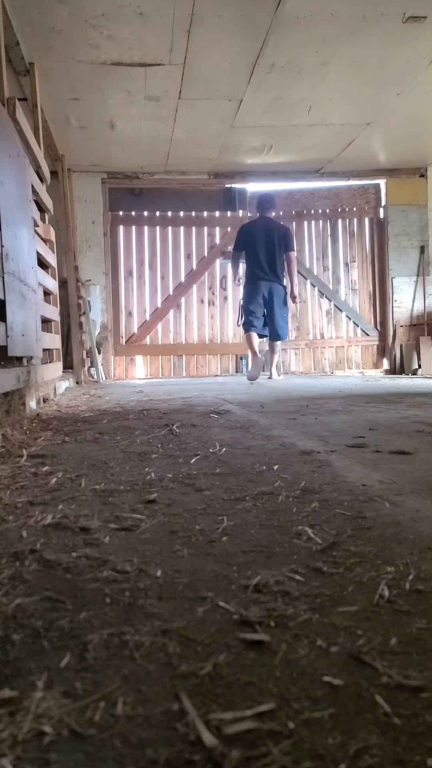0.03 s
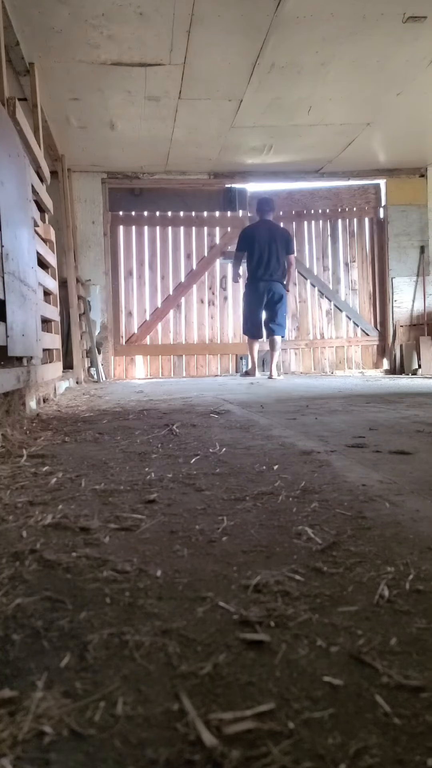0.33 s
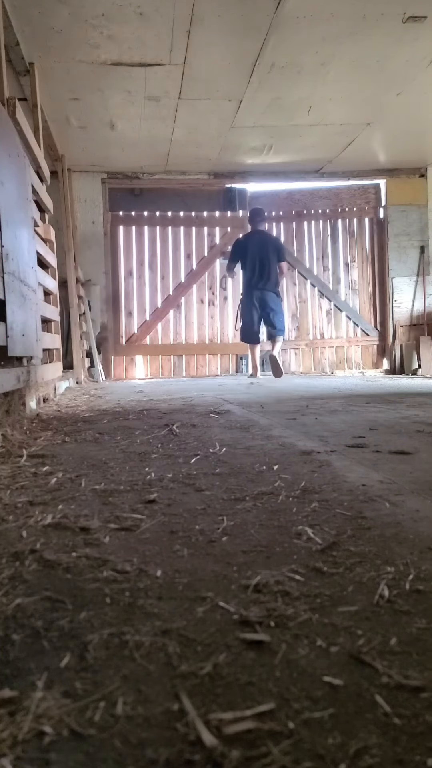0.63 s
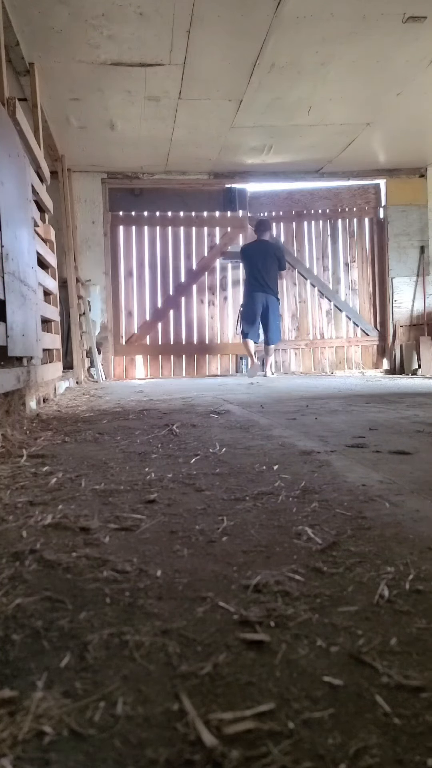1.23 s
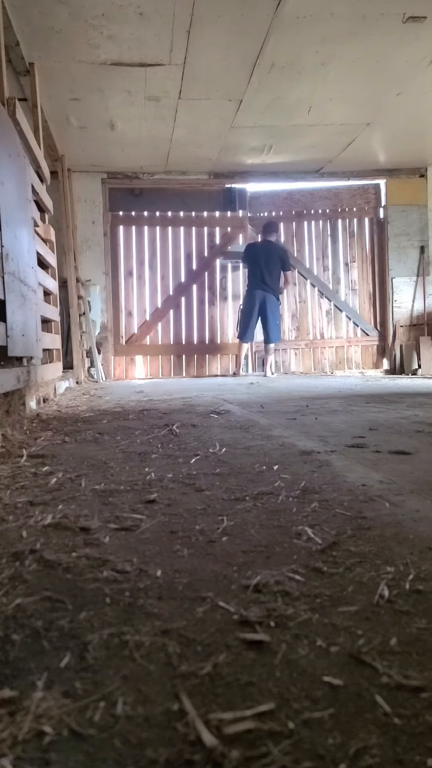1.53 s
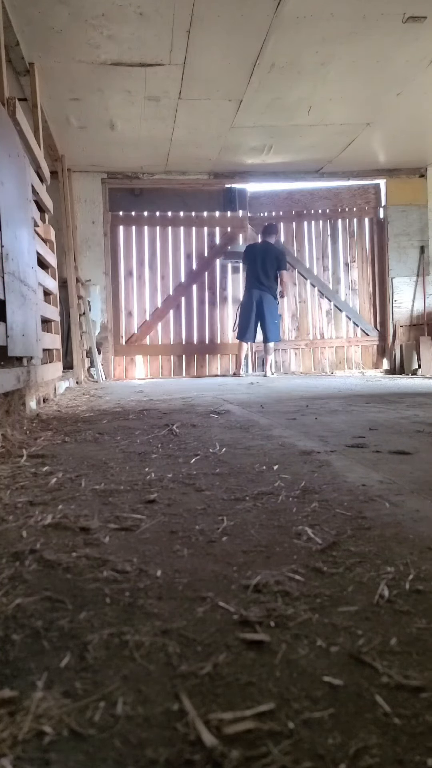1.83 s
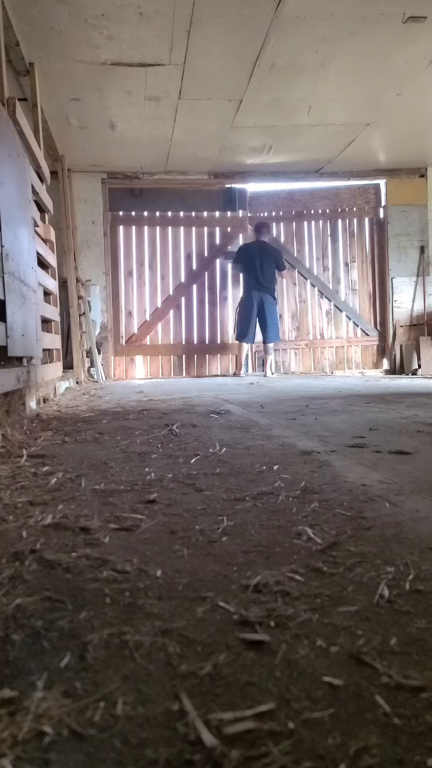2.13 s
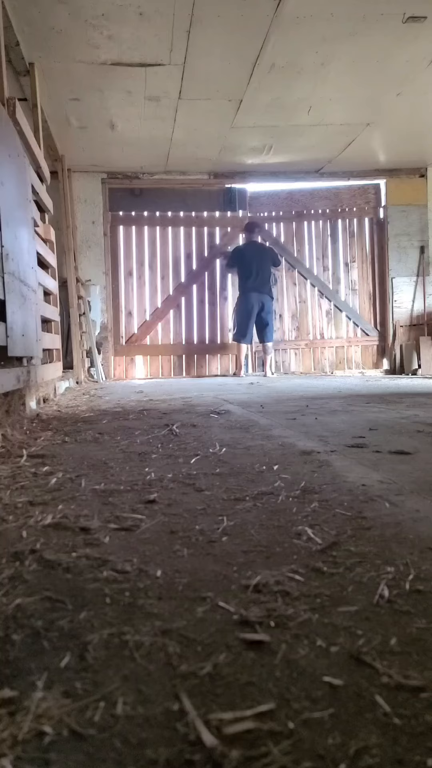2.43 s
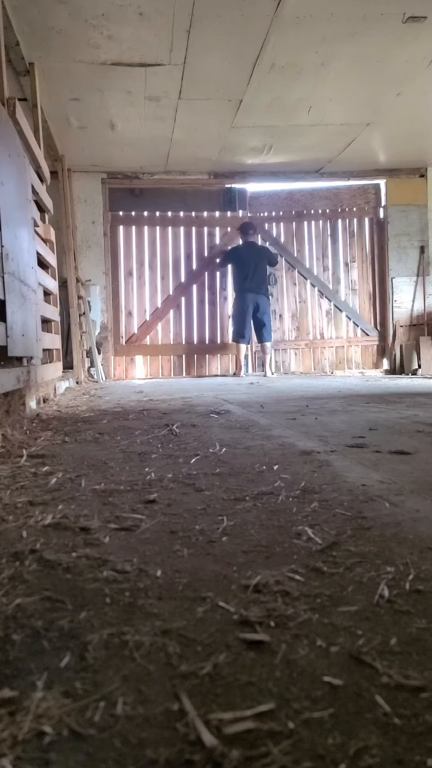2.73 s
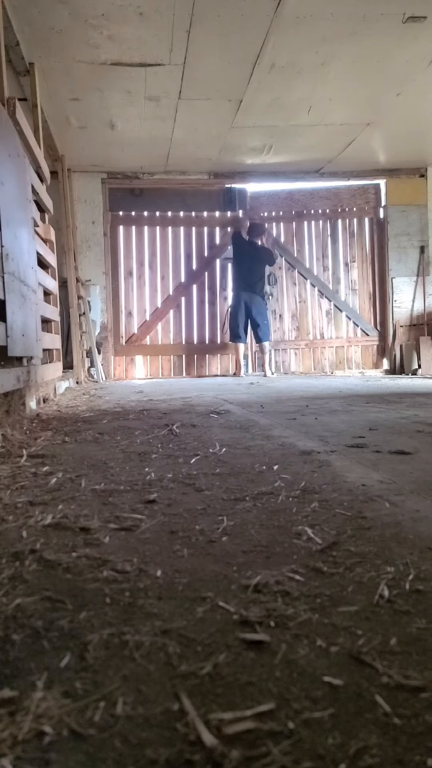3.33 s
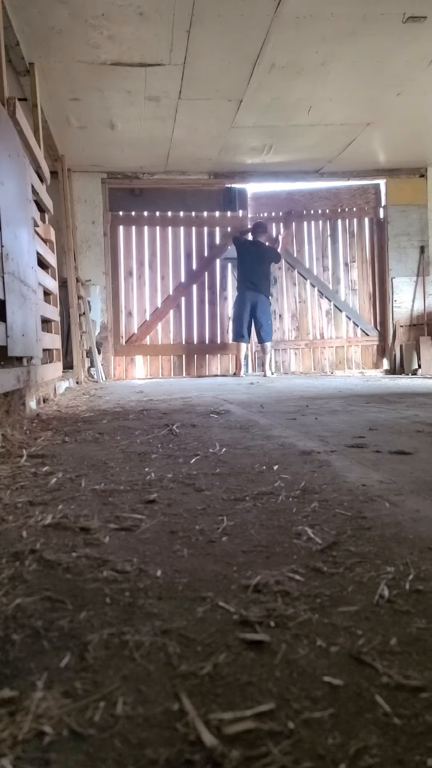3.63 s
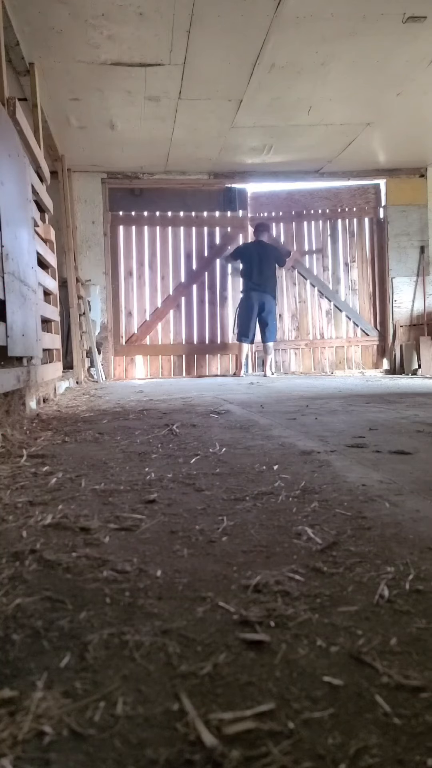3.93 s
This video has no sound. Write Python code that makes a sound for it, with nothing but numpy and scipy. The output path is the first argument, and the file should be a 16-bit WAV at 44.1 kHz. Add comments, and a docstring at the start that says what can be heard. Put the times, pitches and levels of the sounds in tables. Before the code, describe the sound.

Wooden barn door clattering and rumbling as it is pulled, following a few quiet steps.

```python
"""An empty barn with a straw-strewn floor. Someone takes a few soft steps, knocks twice against the
big slatted door and pulls it along. Small slips scrape and its weight rumbles; loose boards clatter,
ironwork snaps, wood creaks and jolts set the whole panel booming. The barn answers every sound;
a two-port microphone listens from far back, over a faint hiss."""
import sys
import numpy as np
from scipy import signal
from scipy.fft import rfft, irfft
from scipy.io import wavfile
from scipy.ndimage import uniform_filter1d

SR = 44100
rng = np.random.default_rng(int(sys.argv[2]) if len(sys.argv) > 2 else 0)


def digitize_waveform(pressure):
    """Quantize a signal to 16-bit integers and store it at the path in sys.argv[1].

    Rows of a 2-D input are taken as channels; values are limited to [-1, 1].
    """
    field = np.atleast_2d(pressure).T
    bounded = np.clip(field, -1, 1)
    quanta = np.round(bounded * 32767).astype(np.int16)
    wavfile.write(sys.argv[1], SR, quanta)


N = 176400


def knocks():
    """Knocks and loose-board clatter: each blow a short wood-on-wood chatter with its own tone."""
    # tone bands (frequency [Hz])
    bands_hz = [200, 900, 1900, 3800]
    # blows (time [s], gain in each of the four bands [dB])
    blows = [(1.773, -2.5, 4.5, 4.5, 0.5), (2.277, -4, 4.5, 7, -15), (2.294, 1, -1.5, 8.5, -9.5),
             (2.760, -38, -8, -10.5, -6.5), (2.870, -5, 0, 7, 0.5), (2.892, 3.5, 8.5, -19, -15),
             (2.972, -1.5, -6, -1, -5), (3.057, -0.5, 2, 5, 1.5), (3.084, -24, 4, -1, -10),
             (3.157, -2, -3, -1, 0), (3.472, 8, 2.5, 6, 1.5), (3.492, -4, -2, -16, -9),
             (3.620, 5, 2.5, 4, -2), (3.728, 1.5, 0, -1, -5), (3.831, -2, 0.5, 2.5, -3),
             (3.941, -1.5, -2.5, 0, -4.5)]
    # board spectrum (frequency [Hz], gain [dB])
    wood_eq = [(65, -12), (170, 1), (1200, 4.5), (1700, -2.5), (4200, 2.5), (5600, -5.5), (7000, -6.5),
               (8500, -32.5)]
    out = np.zeros(N)
    for s, *gains_db in blows:
        add(out, s, colour(burst(decay_s=0.0075), list(zip(bands_hz, gains_db))))
    return colour(out, wood_eq)


def slats():
    """A squarely struck slat rings briefly at its own pitch."""
    # strikes (time [s], pitch [Hz], level [dB])
    strikes = [(1.764, 757, -36), (2.277, 651, -39), (2.297, 1244, -38.5), (2.892, 643.5, -33.5)]
    # slat modes (pitch ratio [1], level [dB], t60 [s])
    modes = [(.49, -6.5, .13), (1, 1, .11), (1.56, 1.5, 0.12)]
    out, t = np.zeros(N), np.arange(SR) / SR
    for s, hz, db in strikes:
        add(out, s, amp(db) * modal_ring(modes, hz, t))
    return out


def drag():
    """Countless small slips scrape; the door's weight rumbles."""
    # pull envelope (time [s], scrape [dB], rumble [dB])
    pull = [(2.74, -64, -108), (2.797, -53, -84), (3.03, -48.5, -59.5), (3.08, -42, -50.5),
            (3.33, -41.5, -52.5), (3.43, -45.5, -42), (3.56, -41.5, -44.5), (3.68, -48.5, -49),
            (3.80, -54, -64), (3.87, -53, -56.5), (4.0, -49, -63)]
    # scrape and rumble spectra (frequency [Hz], gain [dB])
    scrape_eq = [(60, -16.5), (200, -3), (1200, 0.5), (2100, -4.5), (3200, -3), (6300, -6), (8600, -23.5),
                 (15000, -26.5)]
    rumble_eq = [(30, -1), (70, -5), (170, -1), (280, -5.5), (1500, -53.5)]
    s, scrape_db, rumble_db = np.transpose(pull)
    t = np.arange(N) / SR
    scrape = unit(colour(grains(per_s=500, spread_db=5), scrape_eq))
    rumble = unit(colour(rng.standard_normal(N), rumble_eq))
    scrape *= amp(np.interp(t, s, scrape_db))
    rumble *= amp(np.interp(t, s, rumble_db))
    return (t > s[0]) * (scrape + rumble)


def booms(rise_s=0.00093):
    """Jolts excite the low modes of the whole panel."""
    # jolts (time [s], pitch [Hz], level [dB])
    jolts = [(1.783, 126, -52), (3.158, 172, -40.5), (3.362, 192, -32.5), (3.396, 157, -31),
             (3.449, 175.5, -29), (3.475, 204, -37), (3.528, 214, -33), (3.605, 175, -36.5)]
    # panel modes (pitch ratio [1], level [dB], t60 [s])
    modes = [(.62, -7.5, 0.1), (1, 1.5, 0.15), (1.98, -11.5, 0.16)]
    out, t = np.zeros(N), np.arange(SR // 2) / SR
    attack = 1 - np.exp(-t / rise_s)
    for s, hz, db in jolts:
        add(out, s, amp(db) * attack * modal_ring(modes, hz, t))
    return out


def fittings():
    """Bright snaps of the door's ironwork."""
    # snaps (time [s], level [dB])
    snaps = [(2.760, -20.5), (3.056, -12)]
    # iron spectrum (frequency [Hz], gain [dB])
    iron_eq = [(2000, -36.5), (7000, -5.5)]
    out = np.zeros(N)
    for s, db in snaps:
        add(out, s, amp(db) * burst(decay_s=0.004))
    return colour(out, iron_eq)


def creaks(damping_hz=94):
    """Wood slipping on wood excites one narrow resonance."""
    # slips (time [s], length [s], pitch [Hz], level [dB])
    slips = [(3.835, 0.037, 887, -44), (3.869, 0.042, 790, -45)]
    out = np.zeros(N)
    for s, length_s, hz, db in slips:
        t = np.arange(0, length_s, 1 / SR)
        ring = np.exp(-np.pi * damping_hz * t) * t * np.sin(2 * np.pi * hz * t)
        rub = signal.fftconvolve(rng.standard_normal(len(t)), ring)[:len(t)]
        add(out, s, amp(db) * unit(rub * np.sin(np.pi * t / length_s)))
    return out


def feet():
    """Soles pat the floor; straw snaps and rustles under them."""
    # footfalls and straw snaps (time [s], sole [dB], straw [dB])
    steps = [(.125, -33, -14.5), (.211, 3.5, -15.5), (.224, -16, -22), (.603, -15.5, -20),
             (0.642, -40, -17.5), (.715, -18, -14), (0.79, -6.5, -16), (.802, -21, -16),
             (1.226, -11.5, -28), (1.294, -10.5, -30), (1.396, -9.5, -17)]
    # brushes through straw (peak time [s], rise [s], fall [s], level [dB])
    shuffles = [(.09, 0.14, 0.034, -53), (.21, 0.079, 0.22, -59), (.70, 0.13, 0.039, -54.5),
                (1.34, 0.23, 0.16, -57), (1.721, 0.073, 0.049, -45.5)]
    # sole and straw spectra (frequency [Hz], gain [dB])
    sole_eq = [(130, -17), (400, -6), (650, -11.5), (1200, -7), (2000, -21), (9000, -43)]
    straw_eq = [(100, -14), (1200, 3.5), (2200, 0), (3500, 6), (6200, 4.5), (7500, 0.5), (8700, -15)]
    sole, straw, brushing = np.zeros((3, N))
    t = np.arange(N) / SR
    for s, sole_db, straw_db in steps:
        add(sole, s, amp(sole_db) * burst(decay_s=0.0045))
        add(straw, s, amp(straw_db) * burst(decay_s=0.004))
    for s, rise_s, fall_s, db in shuffles:
        width_s = np.where(t < s, rise_s, fall_s)
        brushing += amp(db) * np.exp(-((t - s) / width_s) ** 2)
    rustle = unit(colour(grains(per_s=600, spread_db=3.5), straw_eq))
    return colour(sole, sole_eq) + colour(straw, straw_eq) + brushing * rustle


def bounce(x, decay_s=0.007):
    """Floor and door throw a hit back within milliseconds."""
    echo = diffuse(np.array([burst(decay_s), burst(decay_s)]))
    return signal.oaconvolve(x[None], echo, axes=1)[:, :N]


def barn(x, early_per_s=1200, early_decay_s=0.023, early_db=-5, tail_rise_s=0.0091, tail_db=-2):
    """Sparse early reflections off floor and ceiling, then a tail that dies band by band."""
    # reverberation (frequency [Hz], t60 [s])
    reverb_times = [(100, 0.77), (700, 0.57), (1840, 0.62), (4850, 0.58), (9000, 0.58), (15000, 1)]
    t = np.arange(SR) / SR
    early = rng.standard_normal((2, SR)) * (rng.random((2, SR)) < early_per_s / SR)
    early *= np.exp(-t / early_decay_s)
    hz, frame_s, bands = signal.stft(rng.standard_normal((2, SR)), SR, nperseg=256)
    bands *= amp(-60 * frame_s / read(reverb_times, hz)[:, None])
    tail = signal.istft(bands, SR, nperseg=256)[1][:, :SR]
    tail *= 1 - np.exp(-t / tail_rise_s)
    echo = diffuse(amp(early_db) * unit(early) + amp(tail_db) * unit(tail)) / np.sqrt(SR)
    return signal.fftconvolve(x[None], echo, axes=1)[:, :N]


def varied_echoes(x, tails=4, cycle_s=0.37):
    """Barn reverberation, crossfaded cyclically among random tails so no fixed pitch rings."""
    turns = np.arange(N) / SR / cycle_s
    shares = np.array([np.maximum(np.cos(2 * np.pi * (turns - k / tails)), 0) for k in range(tails)])
    shares /= np.linalg.norm(shares, axis=0)
    return sum(barn(x * share) for share in shares)


def hiss():
    """Still air and microphone hiss."""
    # noise spectrum (frequency [Hz], gain [dB])
    hiss_eq = [(60, 16.5), (150, 8.5), (1200, 6.5), (2000, 0), (6300, 13), (8500, -8), (12500, 13),
               (15000, 2.5)]
    noise = diffuse(rng.standard_normal((2, N)))
    return unit(np.array([colour(port, hiss_eq) for port in noise]))


def diffuse(pair, spacing_m=0.23, sound_m_per_s=343):
    """Sound from all sides reaches both ports alike in the bass only."""
    a, b = rfft(pair)
    hz = np.fft.rfftfreq(pair.shape[1], 1 / SR)
    coherence = np.sinc(2 * hz * spacing_m / sound_m_per_s)
    return irfft(np.array([a, coherence * a + np.sqrt(1 - coherence ** 2) * b]), pair.shape[1])


def burst(decay_s, rise_s=0.00069, size=8192):
    """Dying flurry of tiny contacts: unpitched, unit energy."""
    t = np.arange(size) / SR
    envelope = (1 - np.exp(-t / rise_s)) * np.exp(-t / decay_s)
    x = rng.standard_normal(size) * envelope
    for _ in range(6):
        x = irfft(np.exp(1j * np.angle(rfft(x))))  # flatten the spectrum
        local_rms = np.sqrt(abs(uniform_filter1d(x ** 2, size=128)) + 1e-12)
        x = x * envelope / local_rms
    return x / np.linalg.norm(x)


def grains(per_s, spread_db):
    """Random clicks of uneven size, unit rms."""
    size = amp(spread_db * np.minimum(rng.exponential(1, N), 4))
    return unit(size * rng.choice([-1, 1], N) * (rng.random(N) < per_s / SR))


def modal_ring(modes, hz, t):
    """One decaying sine per mode."""
    return sum(amp(db - 60 * t / t60_s) * np.sin(2 * np.pi * hz * ratio * t)
               for ratio, db, t60_s in modes)


def colour(x, eq, size=4096):
    """Minimum-phase filter from (Hz, dB) points."""
    log_gain = np.log(amp(read(eq, abs(np.fft.fftfreq(size, 1 / SR)))))
    response = np.exp(np.conj(signal.hilbert(log_gain)))
    taps = np.fft.ifft(response).real[:size // 2]
    return signal.fftconvolve(x, taps)[:len(x)]


def read(points, hz):
    """Interpolates a table over log frequency."""
    points_hz, values = np.transpose(points)
    return np.interp(np.log(hz + 1), np.log(points_hz + 1), values)


def add(mix, s, sound):
    """Mixes a sound in at s seconds."""
    part = mix[max(round(s * SR), 0):][:len(sound)]
    part += sound[:len(part)]


def amp(db):
    """Decibels to gain."""
    return 10 ** (np.asarray(db) / 20)


def unit(x):
    """Scales to unit rms."""
    return x / np.sqrt(np.mean(x ** 2) + 1e-20)


def scene(hits_db=-1.5, direct_db=-8, bounce_db=-9, boom_send_db=-12, hiss_db=-64, port_lag_s=0.000349):
    """Feet and door at the far end of the barn, over a faint hiss."""
    hits = feet() + knocks() + fittings() + slats()
    far = amp(hits_db) * hits + creaks() + drag()
    panel = booms()
    t = np.arange(N) / SR
    direct = amp(direct_db) * np.array([far, np.interp(t - port_lag_s, t, far)])
    background = amp(hiss_db) * hiss()
    thrown_back = amp(bounce_db) * bounce(hits)
    reverb = varied_echoes(far + amp(boom_send_db) * panel)
    return direct + panel + thrown_back + reverb + background


def record(dry, cutoff_hz=15500):
    """Each port has its own resonances, at constant summed power; then a low-pass."""
    # port balance (frequency [Hz], left minus right [dB])
    balance = [(500, 0.8), (800, 3), (1300, 0), (2300, 2), (4500, -9), (5900, -8.5), (7800, 9.5),
               (9200, -27), (12000, -3)]
    hz, balance_db = np.transpose(balance)
    right_db = -10 * np.log10((1 + amp(balance_db) ** 2) / 2)
    left = colour(dry[0], list(zip(hz, right_db + balance_db)))
    right = colour(dry[1], list(zip(hz, right_db)))
    lowpass = signal.firwin(511, cutoff_hz, window=("kaiser", 9), fs=SR)
    return signal.oaconvolve(np.array([left, right]), lowpass[None], "same")


dry = scene()
out = record(dry)
digitize_waveform(out)
```